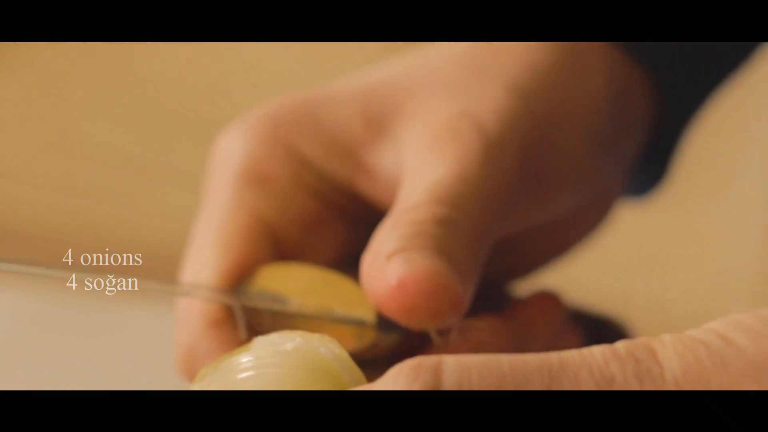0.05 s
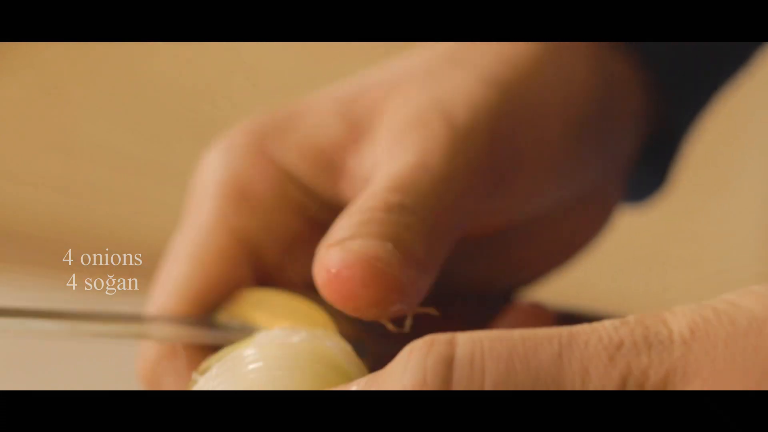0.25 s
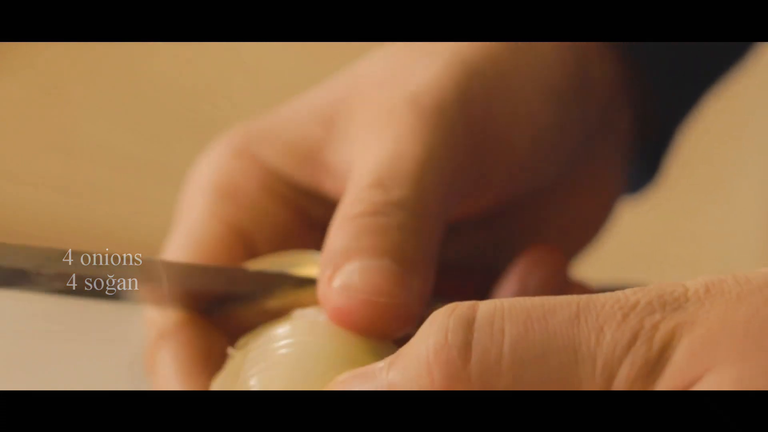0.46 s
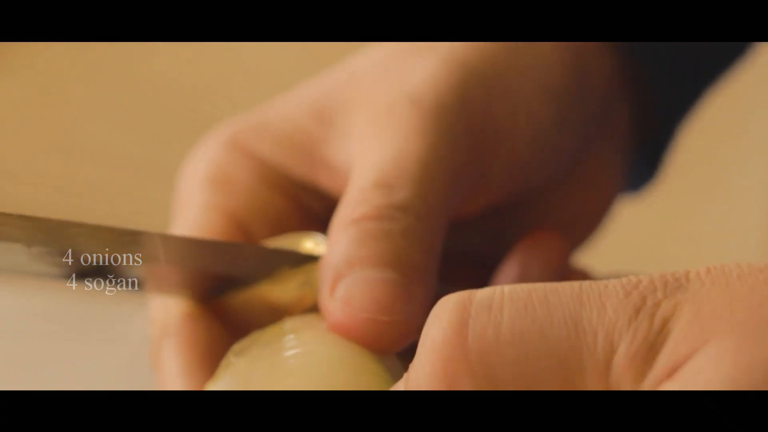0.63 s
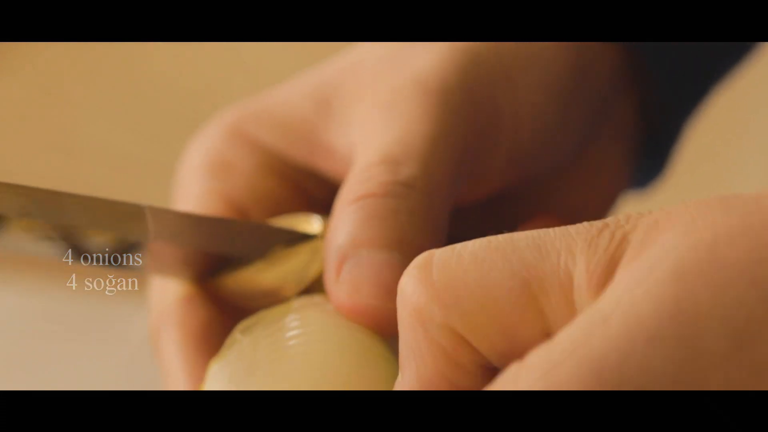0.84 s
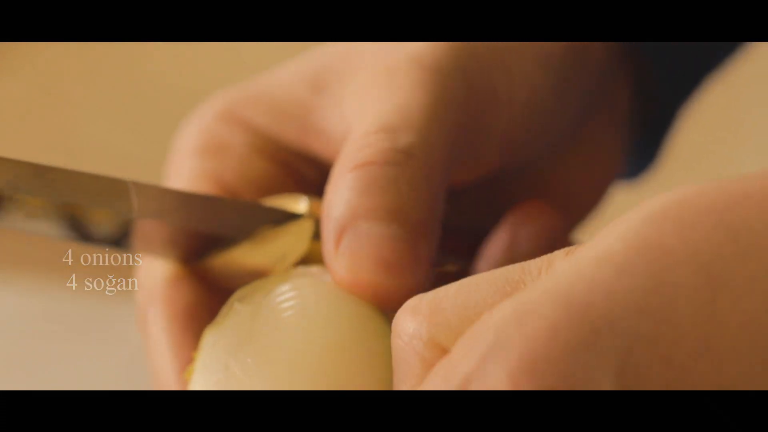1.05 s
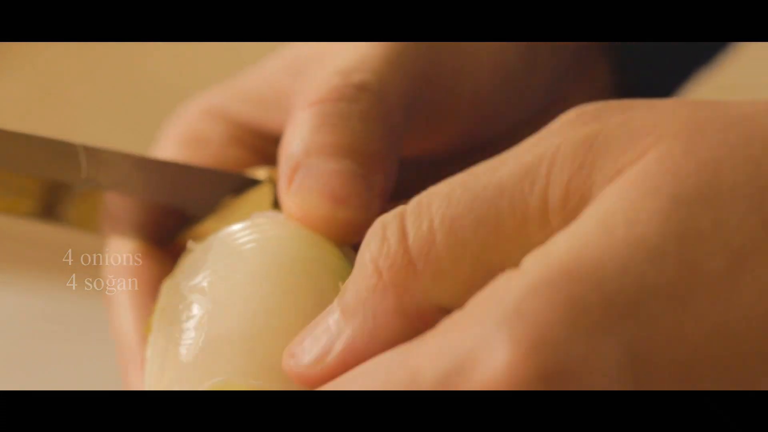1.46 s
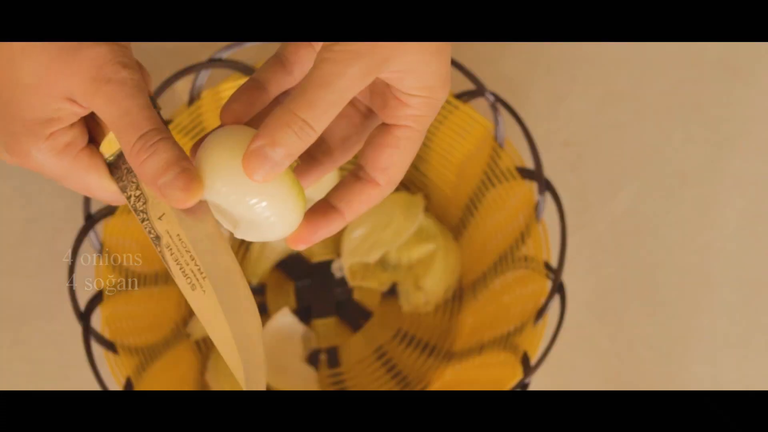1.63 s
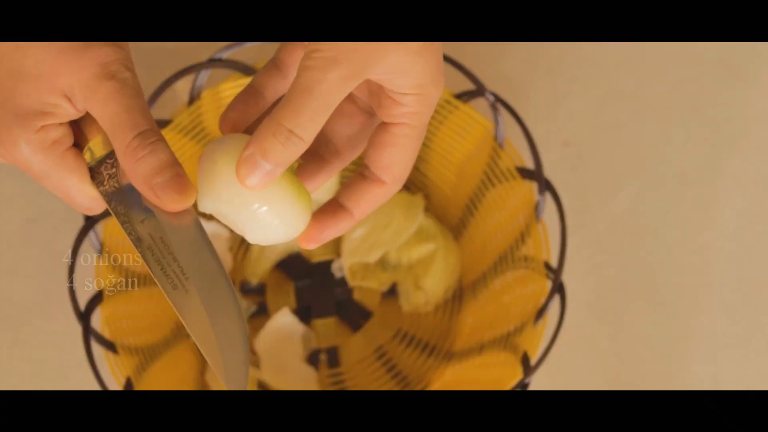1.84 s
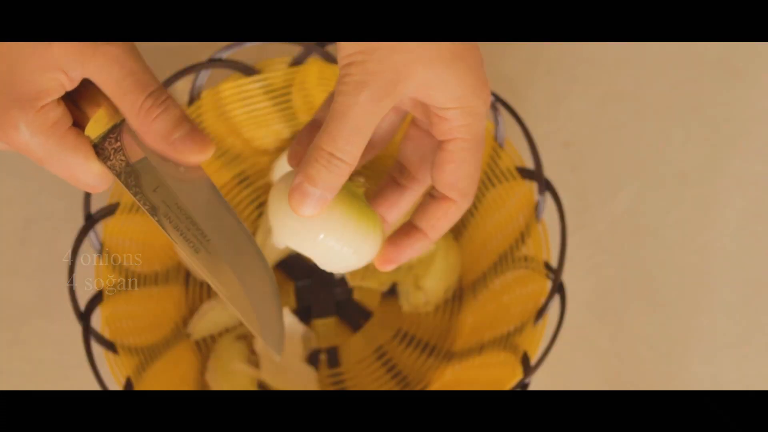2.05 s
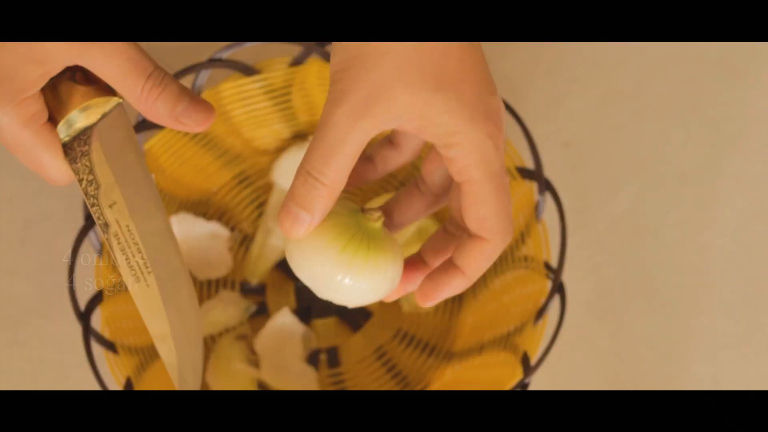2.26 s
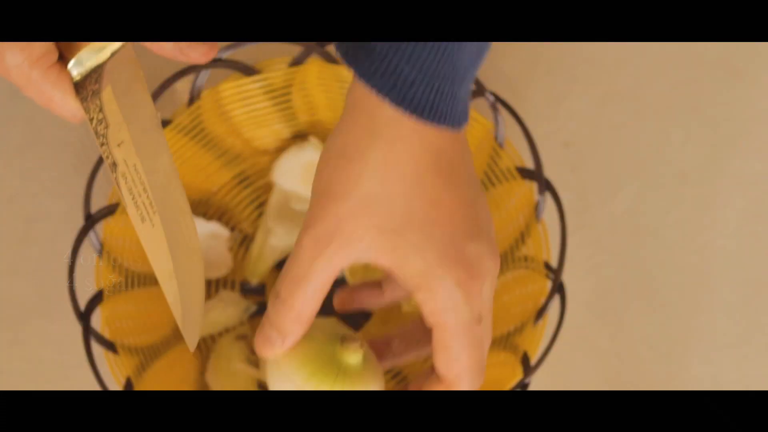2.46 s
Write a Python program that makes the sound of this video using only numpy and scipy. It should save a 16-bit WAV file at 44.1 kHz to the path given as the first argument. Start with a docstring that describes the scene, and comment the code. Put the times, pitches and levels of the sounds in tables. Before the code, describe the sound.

Onion skin is peeled off close to the microphone in a quiet kitchen. A knife ticks once, the skin tears with a swelling crackle and snap, then peel taps lightly into a plastic basket over low room hiss.

```python
"""Peeling an onion

A quiet kitchen, close to the microphone, with a low room drone and hiss behind. A knife ticks
once as it bites into an onion. The skin is pulled off in a swelling, crackling tear that ends in
a snap, over the soft rumble of the hands. The sound drops out briefly at an edit and a faint
appliance hum comes in; then the peel falls into a plastic basket, which rings with each tap."""
import sys
import numpy as np
from scipy import signal
from scipy.fft import rfft, irfft
from scipy.io import wavfile
from scipy.ndimage import uniform_filter1d

SR = 44100
rng = np.random.default_rng(int(sys.argv[2]) if len(sys.argv) > 2 else 0)


def store_pcm(level_fs):
    """Save levels as 16-bit WAV."""
    pcm = np.round(np.clip(level_fs, -1, 1) * 32767).astype(np.int16)
    wavfile.write(sys.argv[1], SR, np.atleast_2d(pcm).T)


N = 110250
TIME = np.arange(N) / SR

# room tone, and its side signal against the mid: (frequency [Hz], relative level [dB])
ROOM_SPECTRUM = [(15, -43), (25, -16), (45, -10), (85, -11.5), (145, -5.5), (175, -7.5), (228, -1.5),
                 (275, -8.5), (385, -9.5), (470, -12.5), (700, -15), (1000, -16.5), (1500, -20),
                 (2500, -22), (5000, -24), (8200, -25), (16000, -28)]
ROOM_SIDE = [(60, -33), (180, -41.5), (350, -23.5), (700, -18), (1500, -19.5), (4000, -15), (14000, -9.5)]
# appliance in the background: (frequency [Hz], level [dB])
HUM_TONES = [(191, -57.5), (383, -68)]
# hands shift, the bulb creaks, loose skin slides: (time [s], rise [s], fall [s], level [dB])
GRIP_SWELLS = [(0.24, 0.21, 0.12, -56.5), (1.2, 0.025, 0.088, -49), (1.28, .03, 0.043, -51),
               (1.2, 0.036, 0.072, -46.5), (1.515, 0.026, 0.021, -48)]
CREAK_SWELLS = [(0.90, 0.015, 0.026, -51), (1.15, 0.014, 0.16, -41)]
SLIDE_SWELLS = [(0.495, 0.046, 0.022, -45), (1.772, 0.018, 0.056, -39), (1.885, 0.018, 0.0093, -41)]
# tone of those three and of the tear: (frequency [Hz], relative level [dB])
GRIP_SPECTRUM = [(15, -8), (25, -5), (42, -3), (60, -8), (120, -25), (400, -52)]
CREAK_SPECTRUM = [(50, -28), (100, -4.5), (160, 14.5), (210, 7.5), (300, 1.5), (500, -3), (1200, -45)]
SLIDE_SPECTRUM = [(500, -5), (900, -22), (1250, 4), (1800, -2), (2400, -4), (3500, 0), (5000, 1), (6000, 1),
                  (7200, 2.5), (8500, 4.5), (10300, -6), (13000, 2), (16000, -12)]
TEAR_SPECTRUM = [(290, -46), (500, -44), (708, -21), (855, -9), (919, -11), (1130, -4.5), (2040, -5.5),
                 (2360, -8.5), (4030, -0.5), (5390, -2.5), (7100, -0.5), (8580, 2.5), (10700, -9),
                 (12900, 0.5), (16000, -10.5)]
# resonances of basket, blade and skin: (frequency [Hz], width [Hz], relative level [dB])
BASKET_MODES = [(566, 74, 1), (1237, 280, 1.5), (2390, 470, -2), (3440, 660, -3.5), (5000, 960, -5.5),
                (7060, 1100, -6.5), (8460, 1200, -4), (13700, 5600, -1)]
BLADE_MODES = [(1530, 740, -20), (2760, 990, -4), (3580, 930, -3.5), (5180, 690, -14.5), (7830, 2500, -19),
               (13100, 3000, -20.5)]
SKIN_MODES = [(1460, 1200, 0.5), (3040, 950, -3), (4070, 830, -2.5), (5000, 960, -13), (6960, 1350, -4.5),
              (8620, 1900, -4), (11970, 2400, -3), (14300, 2800, -10)]
# taps in the basket and snapping fibres: (time [s], length [s], level in each band [dB])
BASKET_TAPS = [(1.6384, 0.0043, -48, -23, -15, -14.5, -20), (1.7345, 0.0045, -45, -30, -24, -9, -18),
               (1.7444, 0.0059, -42, -18, -14, -10, -16), (1.7573, 0.0019, -30, -7, -6, -9, -18),
               (1.8602, 0.004, -32, -34, -23, -10.5, -29), (1.8755, 0.0061, -40, -47, -17, -12, -22),
               (1.8797, 0.0038, -18, -15.5, -16.5, -9.5, -14)]
FIBRE_SNAPS = [(0.0730, 0.0036, -30, -27, -23.5, -26), (0.1075, 0.0018, -46, -37, -32, -38),
               (0.1508, 0.0018, -45, -33, -23.5, -42), (0.3520, 0.0044, -34, -29, -27.5, -36),
               (0.4235, 0.0064, -34, -27.5, -26, -25), (0.8475, 0.0032, -28, -24, -23, -38),
               (0.9003, 0.0024, -29, -24, -21, -16), (0.9920, .001, -45, -33, -12.5, -47),
               (1.0172, 0.0013, -43, -17.5, -20, -13), (1.0275, .001, -41, -30, -20, -15),
               (1.0305, .001, -41, -20, -16, -16), (1.0365, 0.0026, -34, -15.5, -21, -28),
               (1.0868, 0.0011, -44, -32, -8, -19), (1.1178, 0.0013, -14.5, -9.5, 4.5, -18),
               (1.1230, 0.0034, -22, -15.5, -4.5, -10), (1.1702, 0.0033, -36, -12, -18, -22),
               (1.1790, 0.0043, -40, -10, -23, -20), (1.1915, .002, -36, -14, -17, -9.5),
               (1.2081, 0.0011, -36, -27, -12, -23), (1.2205, 0.0071, -33, -11, -14, -17),
               (1.2372, 0.0051, -16.5, -10.5, -3, -4.5), (1.2418, 0.00064, -10.5, -25, -17, -10),
               (1.2557, .0007, -31, -17, -20, 1), (1.2585, 0.00086, -15.5, 0.5, -1, -5),
               (1.2597, 0.0018, -30, -29, -12, -7), (1.2676, .0005, -17, -27, -17, -19),
               (1.3803, 0.00054, -33, -24, -34, -14), (1.4260, 0.00092, -29, -38, -34, -26)]
# centres of those bands: (frequency [Hz])
TAP_BANDS = [560, 1300, 3300, 8000, 13000]
SNAP_BANDS = [1300, 3300, 8000, 13000]
# the blade catches again and meets the bulb: (delay [s], level against the tick [dB])
BLADE_CATCHES = [(.0018, -19), (.0038, -19.5), (.0083, -27), (0.012, -27), (.0148, -27)]
# the bulb thuds under the blade: (delay [s], frequency [Hz], width [Hz], level [dB])
BULB_THUD = [(.0005, 630, 275, -15), (.002, 280, 168, -16), (.002, 110, 79.4, -15.5)]
# strength of the pull on the skin: (time [s], level [dB])
PULL_CURVE = [(0.82, -58), (0.852, -45), (0.878, -51), (0.902, -35.5), (0.928, -44.5), (0.942, -51),
              (0.98, -50), (1.005, -48), (1.02, -38), (1.05, -40.5), (1.075, -33.5), (1.10, -39.5),
              (1.13, -33.5), (1.155, -40), (1.18, -39), (1.212, -36), (1.238, -31.5), (1.268, -30.5),
              (1.28, -43), (1.34, -67), (1.36, -42.5), (1.41, -48), (1.47, -66), (1.54, -72)]

EDIT_START_S, EDIT_END_S, EDIT_DIP_DB = 1.542, 1.564, -29


def from_db(db):
    """Decibels to gain."""
    return 10 ** (np.asarray(db) / 20)


def unit_energy(x):
    """Scale to an energy of one."""
    return x / np.sqrt(np.sum(x ** 2) + 1e-20)


def level_at(spectrum, hz):
    """Read a spectrum in dB on a log-frequency axis."""
    freqs, db = np.transpose(spectrum)
    return np.interp(np.log(np.maximum(hz, 1)), np.log(freqs), db)


def colour(x, spectrum):
    """Filter by a table of (frequency [Hz], level [dB])."""
    hz = np.arange(N // 2 + 1) * SR / N
    return irfft(rfft(x) * from_db(level_at(spectrum, hz)), N)


def shaped(x, spectrum):
    """Colour a signal and bring it to an rms of one."""
    return unit_energy(colour(x, spectrum)) * np.sqrt(N)


def noise(spectrum):
    """Coloured noise at an rms of one."""
    return shaped(rng.standard_normal(N), spectrum)


def waver(rate_hz):
    """A line wandering between random values."""
    return np.interp(TIME * rate_hz, np.arange(N), rng.standard_normal(N))


def resonate(x, hz, width_hz):
    """A damped resonance, applied twice for steep skirts; energy one."""
    radius = np.exp(-np.pi * width_hz / SR)
    b, a = [1, 0, -0.92], [1, -2 * radius * np.cos(2 * np.pi * hz / SR), radius ** 2]
    return unit_energy(signal.lfilter(b, a, signal.lfilter(b, a, x + 1e-18)))


def add(out, start_s, sound):
    """Mix a short sound in at a time."""
    i = int(start_s * SR)
    out[i:i + len(sound)] += sound[:N - i]


def swells(rows):
    """An envelope of swells, each rising on a bell curve and dying exponentially."""
    envelope = np.zeros(N)
    for peak_s, rise, fall, db in rows:
        before, after = np.minimum(TIME - peak_s, 0), np.maximum(TIME - peak_s, 0)
        envelope += from_db(db) * np.exp(-(before / rise) ** 2 - after / fall)
    return envelope


def crackle(spectrum, spread_db, clump_db, clump_hz, fractures_per_s=10000):
    """Countless tiny fractures of uneven size, coming in clumps."""
    sizes = from_db(spread_db * np.minimum(rng.exponential(1, N), 5))
    clicks = sizes * rng.choice([-1, 1], N) * (rng.random(N) < fractures_per_s / SR)
    return shaped(clicks * from_db(clump_db * waver(clump_hz)), spectrum)


def bursts(events, bands, modes, first_crack, cracks_per_s=9000, size=2048):
    """Each event is one crack and a quickly dying run of smaller ones, ringing the modes."""
    out = np.zeros(N)
    for start_s, length_s, *levels in events:
        cracks = rng.choice([-1, 1], size) * (rng.random(size) < cracks_per_s / SR)
        cracks = cracks * np.exp(-(TIME[:size] / length_s) ** 2)
        cracks[0] = first_crack
        spectrum = list(zip(bands, levels))
        for k, (hz, width, db) in enumerate(modes):
            gain = (-1) ** k * from_db(db + level_at(spectrum, hz))
            add(out, start_s, gain * resonate(cracks, hz, width))
    return out


def room_tone(level_db=-46.5):
    """The kitchen's steady low drone and hiss, nearly mono."""
    mid = noise(ROOM_SPECTRUM)
    side = colour(noise(ROOM_SPECTRUM), ROOM_SIDE)
    return from_db(level_db) * np.array([mid + side, mid - side])


def appliance_hum(waver_db=4.5, waver_hz=6.7):
    """Faint low tones that waver in level, heard from the edit on."""
    hum = np.zeros(N)
    for hz, db in HUM_TONES:
        rms = from_db(db + waver_db * waver(waver_hz))
        hum += rms * np.sqrt(2) * np.sin(2 * np.pi * hz * TIME)
    return hum * (TIME > EDIT_START_S)


def kitchen_reverb(x, t60_s=0.48, build_s=0.001):
    """The room answers the close sounds with a short diffuse tail."""
    t = TIME[:SR // 2]
    envelope = from_db(-60 * t / t60_s) * (1 - np.exp(-t / build_s))
    tail = unit_energy(envelope * rng.standard_normal(len(t)))
    return signal.fftconvolve(x, tail)[:N]


def handling():
    """Close up, the grip rumbles and the bulb creaks dully under the pull."""
    return swells(GRIP_SWELLS) * noise(GRIP_SPECTRUM) + swells(CREAK_SWELLS) * noise(CREAK_SPECTRUM)


def sliding_skin():
    """Loose skin rustles softly as it slides and settles."""
    return swells(SLIDE_SWELLS) * crackle(SLIDE_SPECTRUM, spread_db=2, clump_db=-0.5, clump_hz=251)


def basket_taps():
    """Peel and knife tap the basket and set the plastic ringing."""
    return bursts(BASKET_TAPS, TAP_BANDS, BASKET_MODES, first_crack=2.7)


def knife_bite(start_s=0.2228, tick_gain_db=6.5):
    """One sharp tick of the blade, damped by the hand, with small catches and a dull thud."""
    out, click = np.zeros(N), signal.unit_impulse(2048)
    tick = sum((-1) ** k * from_db(tick_gain_db + db) * resonate(click, hz, width)
               for k, (hz, width, db) in enumerate(BLADE_MODES))
    add(out, start_s, tick)
    for delay, db in BLADE_CATCHES:
        add(out, start_s + delay, from_db(db) * tick)
    for delay, hz, width, db in BULB_THUD:
        add(out, start_s + delay, from_db(db) * resonate(click, hz, width))
    return out


def tearing_skin():
    """Right at the microphone the skin tears away, louder with the pull, and single fibres snap."""
    pull = from_db(np.interp(TIME, *np.transpose(PULL_CURVE), left=-120, right=-120))
    tear = crackle(TEAR_SPECTRUM, spread_db=3, clump_db=1.9, clump_hz=300.3)
    snaps = bursts(FIBRE_SNAPS, SNAP_BANDS, SKIN_MODES, first_crack=1.64)
    return pull * tear + snaps


def scene():
    """Knife, onion and basket sit dead centre; the knife is driest, the basket has the most room."""
    knife = knife_bite()
    skin = tearing_skin() + sliding_skin()
    basket = basket_taps()
    reverb = kitchen_reverb(from_db(-18) * knife + from_db(-13.5) * skin + from_db(-8) * basket)
    return knife + skin + basket + handling() + reverb + room_tone() + appliance_hum()


def record(dry, cutoff_hz=16000):
    """The sound drops out briefly at an edit, and the top treble is cut steeply."""
    gap = (TIME > EDIT_START_S) & (TIME < EDIT_END_S)
    dip = from_db(EDIT_DIP_DB * uniform_filter1d(gap * 1.0, size=64))
    lowpass = signal.ellip(12, 0.1, 80, cutoff_hz, fs=SR, output="sos")
    return signal.sosfilt(lowpass, dry * dip)


dry = scene()
out = record(dry)
store_pcm(out)
```